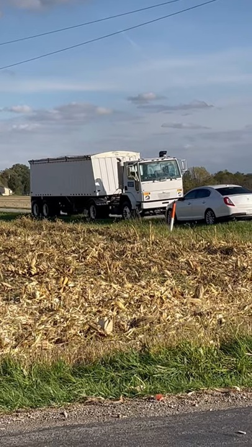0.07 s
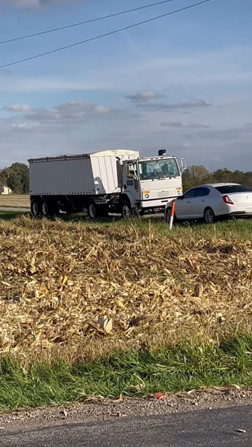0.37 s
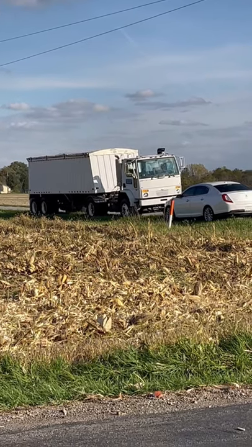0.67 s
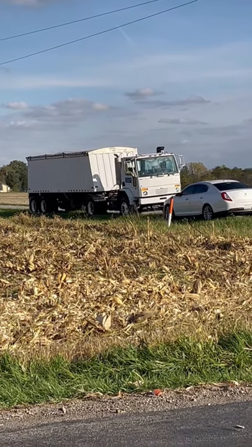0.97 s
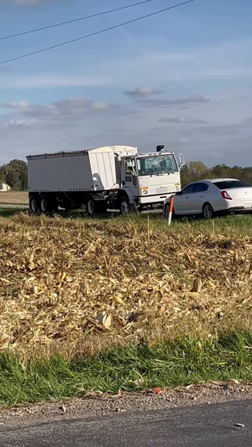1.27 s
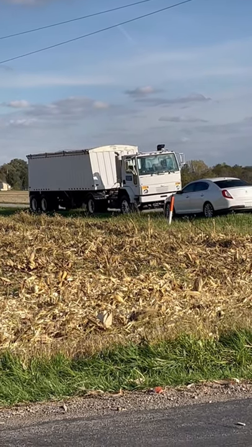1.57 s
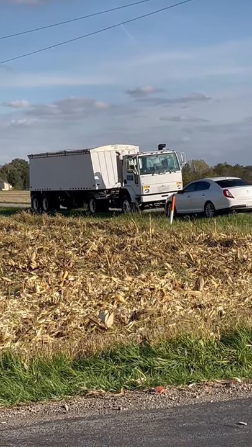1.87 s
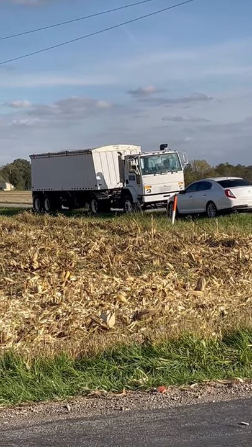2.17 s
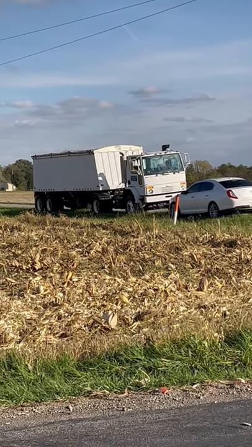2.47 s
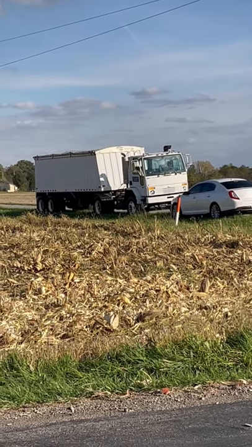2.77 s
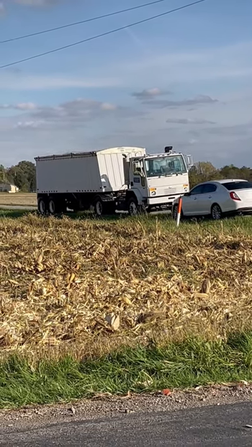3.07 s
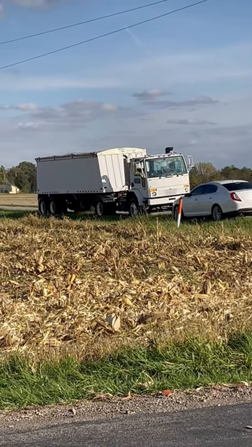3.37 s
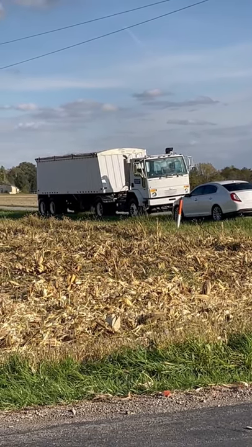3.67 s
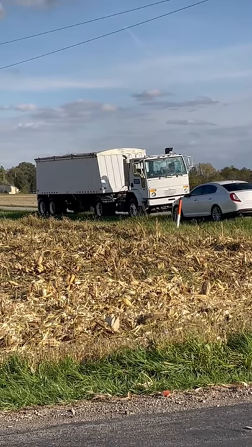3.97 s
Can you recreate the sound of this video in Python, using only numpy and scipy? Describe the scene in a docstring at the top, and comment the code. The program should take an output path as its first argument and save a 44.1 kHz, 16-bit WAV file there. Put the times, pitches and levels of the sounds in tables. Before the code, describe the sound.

A turn signal relay ticks and tocks steadily over a low idling engine hum.

```python
"""An idling engine hums and rumbles through a vehicle's cab while air rushes from the vents.
The hum is a set of tones tied to one speed; rumble and rush are noise shaped by resonances.
The flasher relay ticks on and tocks off at a steady beat, each impact ringing the modes of its housing.
A thin hiss comes and goes, and in the second half a few soft taps excite damped modes of plastic."""
import sys
import numpy as np
from scipy.fft import rfft, irfft, next_fast_len
from scipy.io import wavfile
from scipy.ndimage import map_coordinates

SR = 44100
rng = np.random.default_rng(int(sys.argv[2]) if len(sys.argv) > 2 else 0)


def put_to_file(sound):
    """Save the sound as 16-bit audio at rate SR, in the file named by the first command-line argument."""
    columns = np.atleast_2d(sound).T  # one column per channel
    safe = np.clip(columns, -1, 1)
    whole_steps = np.round(safe * 32767)
    wavfile.write(sys.argv[1], SR, whole_steps.astype(np.int16))


N = 176400

# engine tones (frequency [Hz], rms level [dB], flutter [dB])
ENGINE_TONES = [(54.3, -56, 2.5), (113.4, -45.3, 2), (227.3, -57.3, 1)]
# spectrum of the cab's rumble (frequency [Hz], relative level [dB])
RUMBLE_SPECTRUM = [(20, -33.5), (32, -23), (42, -8), (52, 0.5), (61, 1), (71, 1), (90, -2), (130, 0.5),
                   (185, 0.5), (215, -7.5), (245, -13), (275, -14), (320, -23), (400, -41.5), (700, -39.5),
                   (2000, -96)]
# envelope of the rumble (time [s], level [dB])
RUMBLE_ENVELOPE = [(0, -45.5), (2, -44.5), (4, -42.5)]
# broad spectrum of the vent air (frequency [Hz], relative level [dB])
AIR_SPECTRUM = [(150, -2.5), (350, 0.5), (600, -1.5), (900, -1.5), (1350, -6.5), (2000, -1.5), (2850, -6.5),
                (4000, -6.5), (4650, -9.5), (5400, -17.5), (6300, -17), (7500, -27.5), (9000, -35),
                (14000, -42)]
# resonances of the vent air (centre [Hz], Gaussian width [Hz], lift [dB])
AIR_RESONANCES = [(900, 70, 2), (1110, 45, 5), (1530, 25, 4), (1640, 50, 10), (1895, 55, 10),
                  (2285, 60, 10), (2630, 80, 10), (3000, 55, 10), (3400, 55, 6), (3800, 90, 4),
                  (4090, 90, 4), (4430, 70, 3), (4790, 35, 4), (5170, 70, 3)]
# air noise independent at each microphone port (frequency [Hz], level against the shared noise [dB])
AIR_INCOHERENT = [(150, -2.5), (300, 1.5), (700, -4), (1400, -0.5), (2000, -12), (6000, -18)]
# envelope of the vent air (time [s], level [dB])
AIR_ENVELOPE = [(0, -59.5), (.45, -58), (.9, -60), (1.2, -58.5), (1.6, -59.5), (2.15, -59.5), (2.6, -58),
                (3.1, -59.5), (3.6, -60.5), (4, -58.5)]
# the air's treble against its body (time [s], gain [dB])
AIR_TREBLE_GAIN = [(0, -4.5), (.45, -4.5), (.9, 3.5), (1.3, 1), (2, -3), (2.6, -5.5), (3.2, 0), (4, -2)]
# housing modes as the relay closes and opens (frequency [Hz], level [dB], 60 dB decay time [s])
CLOSING_MODES = [(349, -55.6, 0.071), (498, -47.4, 0.042), (595, -49.8, 0.074), (658, -49.3, 0.086),
                 (706, -42.8, 0.066), (757, -49.2, 0.136), (803, -42.8, 0.114), (1045, -47.2, 0.051),
                 (1125, -49.1, 0.029), (2209, -51.6, 0.032), (2428, -51.6, 0.086), (3907, -46.5, 0.03),
                 (4036, -53.3, 0.071), (5056, -52.5, 0.042), (5652, -46.2, 0.067)]
OPENING_MODES = [(462, -44.5, 0.141), (515, -53.2, 0.085), (591, -46.5, 0.105), (667, -45.3, 0.072),
                 (703, -46.8, 0.136), (752, -43.5, 0.15), (849, -53.0, 0.047), (1041, -49.5, 0.031),
                 (1114, -52.6, 0.039), (1252, -51.2, 0.051), (2118, -47.3, 0.085), (3535, -52.0, 0.083),
                 (3770, -47.0, 0.032), (4960, -54.9, 0.079), (5232, -58.2, 0.04), (5696, -43.9, 0.018)]
# spectra of the contact's snap (frequency [Hz], relative level [dB])
CLOSING_SNAP = [(250, -10.5), (520, 5), (1080, 12.5), (1400, -12), (2400, -1), (3200, -3), (4000, -12.5),
                (6200, -16), (7500, -28), (10000, -40)]
OPENING_SNAP = [(250, -7), (480, 12), (1150, -2.5), (1650, -6), (2800, -4), (3700, 0), (4400, -8.5),
                (5400, -8), (6400, -11.5), (7700, -26.5), (10000, -41)]
# spectrum of the hiss (frequency [Hz], relative level [dB])
HISS_SPECTRUM = [(2500, -19), (5000, 7), (7500, 0.5), (9000, -2.5), (12500, -2.5), (14500, -15)]
# envelope of the hiss (time [s], level [dB])
HISS_ENVELOPE = [(0, -89), (.78, -96.5), (.88, -77.5), (1.24, -76.5), (1.36, -96.5), (1.95, -85),
                 (2.25, -81), (2.42, -73), (2.52, -81), (2.76, -74), (3.0, -79.5), (3.25, -73.5),
                 (3.43, -77), (3.55, -91.5), (3.66, -82.5), (3.8, -90.5)]
# soft impacts (time [s], level [dB], resonance [Hz], thud against ring [dB])
TAP_IMPACTS = [(2.187, -56, 850, -6), (3.380, -45, 800, -3), (3.410, -50, 930, -4), (3.636, -38, 790, -9),
               (3.743, -46.5, 930, -13), (3.827, -44, 1030, -11)]
# modes of the plastic (ratio to the resonance [1], relative level [dB], 60 dB decay time [s])
PLASTIC_MODES = [(.88, -0.5, 0.011), (1.0, -6, 0.033), (1.22, -7, 0.021), (1.9, -15.5, 0.033)]
# phase difference between the ports (frequency [Hz], left minus right [rad])
PORT_PHASE = [(290, 0), (450, -.7), (720, -.9), (880, -.3), (1030, -1), (1300, 0), (1650, -.2), (2000, .95),
              (2200, 1.3), (2500, 2.25), (3700, .9), (4400, 1.35), (5100, 1.35), (5700, 3), (6200, 3.2),
              (7700, 6.2), (8800, 6.4), (9800, 9.3), (10900, 9.5), (11800, 12.5), (13000, 12.6),
              (14000, 15.6)]
# level difference between the ports (frequency [Hz], left minus right [dB])
PORT_LEVEL = [(400, 0), (620, 0), (760, 3), (900, -1.5), (1080, -4), (1350, 2.5), (1520, -3), (1850, 2),
              (2400, 0)]

SPEED_WANDER, RUMBLE_INCOHERENT_DB = 0.0034, -33.5  # the wander is a fraction of idle speed
AIR_SPLIT_HZ, AIR_FLUTTER_DB = 2000, 1
FIRST_TICK_S, FLASH_PERIOD_S, TOCK_AFTER_S = .0298, .7997, .2501
RELAY_RISE_S, REBOUND_DULL_HZ = .001, 1500
SNAP_RISE_S, SNAP_HOLD_S, SNAP_T60_S = 0.0013, 0.003, 0.01
CAB_ECHO_DB, CAB_T60_S, CAB_DULL_HZ = -13, 0.2, 3500
TAP_RISE_S, TAP_THUD_HZ, TAP_THUD_T60_S = 0.0014, 437, 0.03
TAP_CLICK_DB, TAP_CLICK_T60_S, TAP_CLICK_HZ = -16.5, 0.045, 1540
BAND_LIMIT_HZ = 15500


def amp(db):
    """Amplitude ratio: a factor of ten for every 20 dB."""
    return 10 ** (np.asarray(db) / 20)


def unit(x):
    """Normalisation to an rms of 1."""
    return x / np.sqrt(np.mean(x ** 2) + 1e-20)


def along(points, hz):
    """Interpolation of (frequency [Hz], value) points on a logarithmic frequency axis."""
    frequencies, values = np.transpose(points)
    return np.interp(np.log(hz + 1), np.log(frequencies + 1), values)


def curve(rows):
    """Linear interpolation of (time [s], value) points at every sample."""
    return np.interp(np.arange(N) / SR, *np.transpose(rows))


def wobble(knots_per_s):
    """Smooth random modulation: a spline through Gaussian values."""
    knots = rng.standard_normal(int(N * knots_per_s / SR) + 4)
    return map_coordinates(knots, [np.arange(N) * knots_per_s / SR])


def filtered(x, response):
    """Linear filtering: the spectrum is multiplied by a frequency response."""
    n = x.shape[-1]
    padded = next_fast_len(n + SR // 10)
    return irfft(rfft(x, padded) * response(np.fft.rfftfreq(padded, 1 / SR)), padded)[..., :n]


def noise(spectrum, size):
    """Spectral shaping: white noise takes on the given spectrum, at an rms of 1."""
    return unit(filtered(rng.standard_normal(size), lambda hz: amp(along(spectrum, hz))))


def engine():
    """Frequency modulation: idle tones follow one wandering speed, over the noisy boom of the cab."""
    engine_time = np.cumsum(1 + SPEED_WANDER * wobble(3.21)) / SR
    hum = np.zeros(N)
    for hz, db, flutter_db in ENGINE_TONES:
        amplitude = np.sqrt(2) * amp(db + flutter_db * wobble(8))
        hum += amplitude * np.sin(2 * np.pi * (hz * engine_time + rng.random()))
    boom = noise(RUMBLE_SPECTRUM, N) + amp(RUMBLE_INCOHERENT_DB) * noise(RUMBLE_SPECTRUM, (2, N))
    return hum + amp(curve(RUMBLE_ENVELOPE)) * boom


def vent_air():
    """Source and filter: air noise, partly coherent between the ports, passes through resonances."""
    def response(hz):
        lift = sum(db * np.exp(-.5 * ((hz - centre) / width) ** 2)
                   for centre, width, db in AIR_RESONANCES)
        return amp(along(AIR_SPECTRUM, hz) + lift)

    incoherent = filtered(rng.standard_normal((2, N)), lambda hz: amp(along(AIR_INCOHERENT, hz)))
    rush = unit(filtered(rng.standard_normal(N) + incoherent, response))
    body = filtered(rush, lambda hz: 1 / (1 + (hz / AIR_SPLIT_HZ) ** 8))
    treble = amp(curve(AIR_TREBLE_GAIN)) * (rush - body)
    return amp(curve(AIR_ENVELOPE) + AIR_FLUTTER_DB * wobble(60)) * (body + treble)


def ring(modes, t, rise_s):
    """Modal superposition: a struck body sounds as damped sinusoids, neighbours opposite in sign."""
    swing = sum((-1) ** k * amp(db - 60 * t / t60) * np.sin(2 * np.pi * hz * t)
                for k, (hz, db, t60) in enumerate(modes))
    return (1 - np.exp(-t / rise_s)) * swing


def relay_click(modes, snap, snap_db, rebound_s, rebound_gain):
    """Impact excitation: the contact snaps, the housing rings and the cab reverberates."""
    t = np.arange(SR // 5) / SR
    # the armature lands again, softer and duller; a negative gain inverts that blow
    dulled = [(hz, db - 20 * np.log10(1 + (hz / REBOUND_DULL_HZ) ** 2), t60) for hz, db, t60 in modes]
    rebound = rebound_gain * ring(dulled, np.maximum(t - rebound_s, 0), RELAY_RISE_S)
    housing = ring(modes, t, RELAY_RISE_S) + rebound
    echo_envelope = np.minimum(t / SNAP_HOLD_S, 1) * amp(CAB_ECHO_DB - 60 * t / CAB_T60_S)
    echo = filtered(noise(snap, (2, len(t))), lambda hz: 1 / (1 + (hz / CAB_DULL_HZ) ** 4))
    snap_decay = amp(-60 * np.maximum(t - SNAP_HOLD_S, 0) / SNAP_T60_S)
    contact = np.minimum(t / SNAP_RISE_S, 1) * snap_decay * noise(snap, len(t))
    return housing + amp(snap_db) * (contact + echo_envelope * echo)


def flasher_relay():
    """Periodic switching: every flash repeats the same closing tick and opening tock."""
    out = np.zeros((2, N))
    tick = relay_click(CLOSING_MODES, CLOSING_SNAP, snap_db=-46.5, rebound_s=.00429, rebound_gain=.31)
    tock = relay_click(OPENING_MODES, OPENING_SNAP, snap_db=-45, rebound_s=.00655, rebound_gain=-.66)
    for start_s in np.arange(FIRST_TICK_S, N / SR, FLASH_PERIOD_S):
        add(out, start_s, tick)
        add(out, start_s + TOCK_AFTER_S, tock)
    return out


def add(track, start_s, sound):
    """Superposition: a sound sums into the track from its start time."""
    part = track[..., max(round(start_s * SR), 0):][..., :sound.shape[-1]]
    part += sound[..., :part.shape[-1]]


def thin_hiss():
    """Amplitude modulation: treble noise swells and fades under a slow envelope."""
    return amp(curve(HISS_ENVELOPE)) * noise(HISS_SPECTRUM, N)


def taps():
    """Damped free vibration: tapped plastic gives a soft click, a brief ring and a low thud."""
    out, t = np.zeros(N), np.arange(SR // 10) / SR
    click_envelope = amp(TAP_CLICK_DB - 60 * t / TAP_CLICK_T60_S)
    for start_s, db, hz, thud_db in TAP_IMPACTS:
        body = ring([(hz * ratio, level, t60) for ratio, level, t60 in PLASTIC_MODES], t, TAP_RISE_S)
        thud = ring([(TAP_THUD_HZ, 0, TAP_THUD_T60_S)], t, TAP_RISE_S)
        click = unit(filtered(rng.standard_normal(len(t)), lambda f: 1 / (1 + (f / TAP_CLICK_HZ) ** 2)))
        knock = body / np.abs(body).max() + amp(thud_db) * thud / np.abs(thud).max()
        add(out, start_s, amp(db) * (knock + click_envelope * click))
    return out


def scene():
    """Two-point reception: the summed sound reaches two microphone ports at unequal level and phase."""
    cab = engine() + vent_air() + flasher_relay() + thin_hiss() + taps()
    half = np.array([[.5], [-.5]])  # left and right each take half of the difference
    return filtered(cab, lambda hz: amp(half * along(PORT_LEVEL, hz))
                    * np.exp(1j * half * along(PORT_PHASE, hz)))


def record(dry):
    """Band limiting: an ideal low-pass filter removes the highest treble."""
    return filtered(dry, lambda hz: hz < BAND_LIMIT_HZ)


dry = scene()
out = record(dry)
put_to_file(out)
```